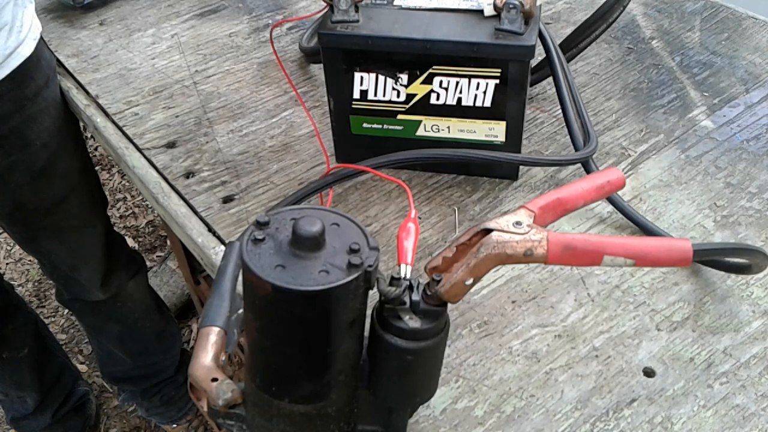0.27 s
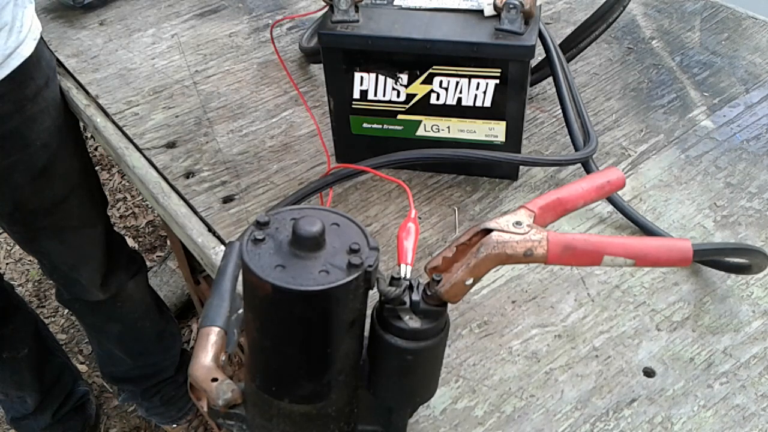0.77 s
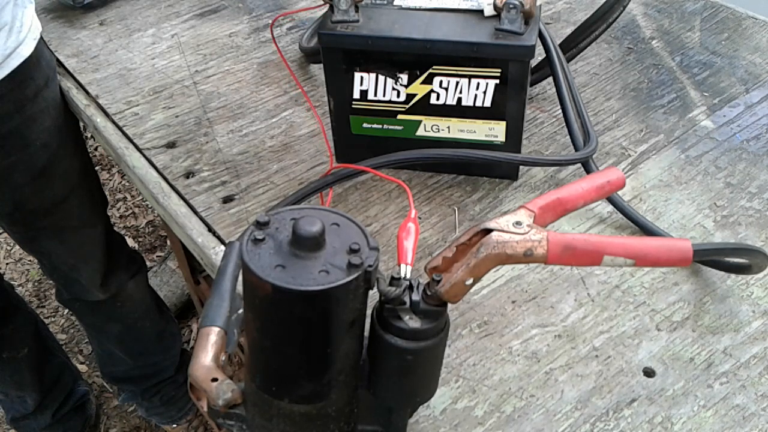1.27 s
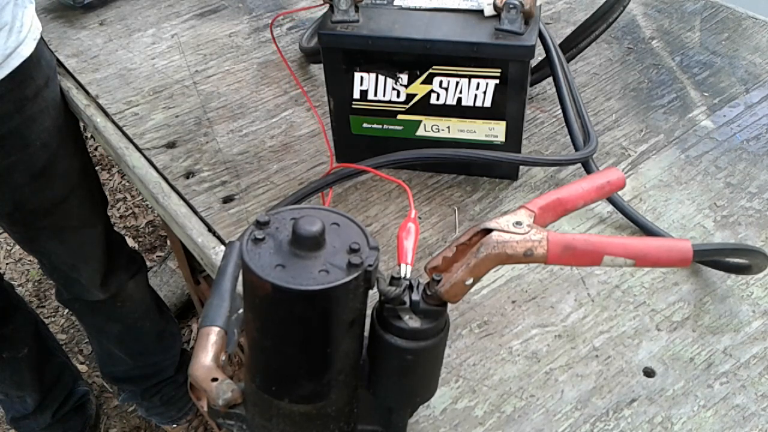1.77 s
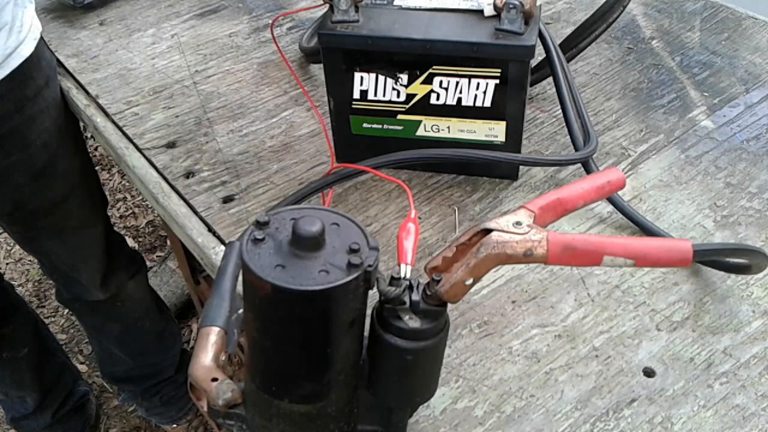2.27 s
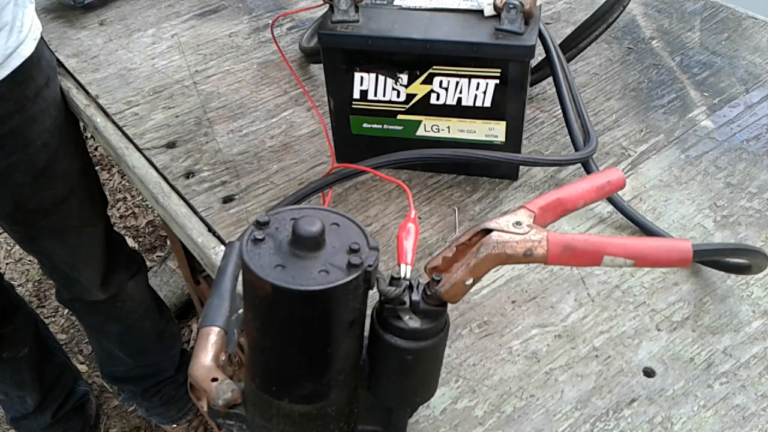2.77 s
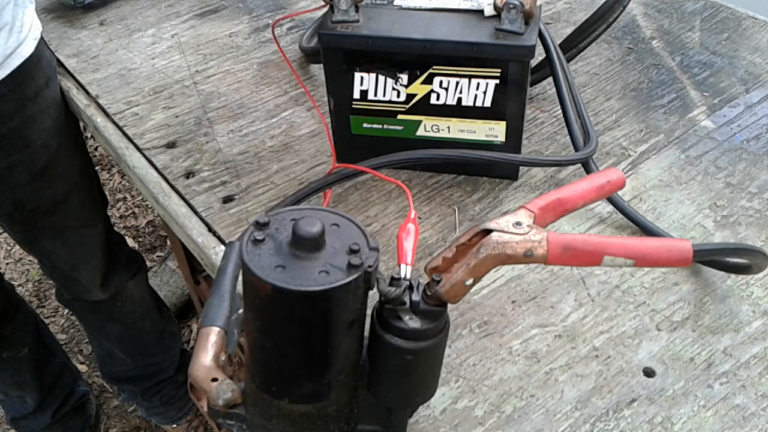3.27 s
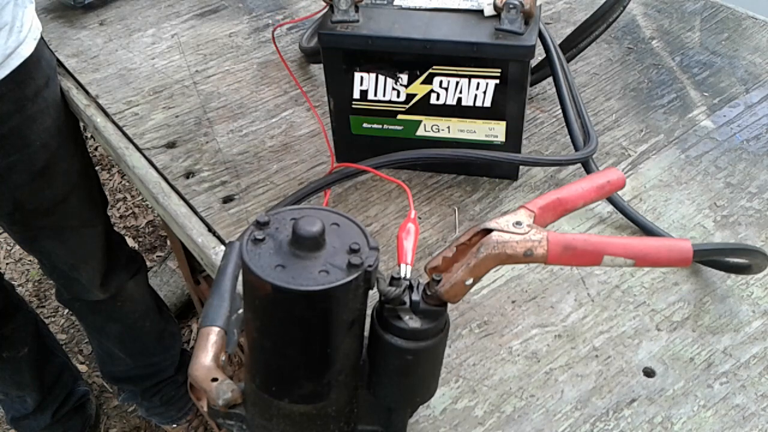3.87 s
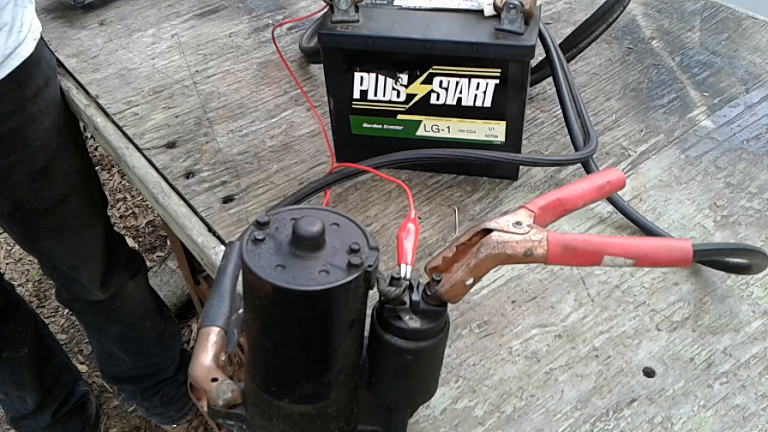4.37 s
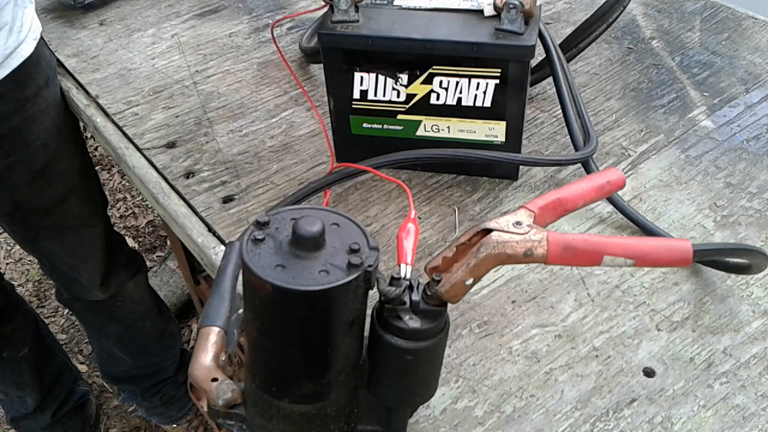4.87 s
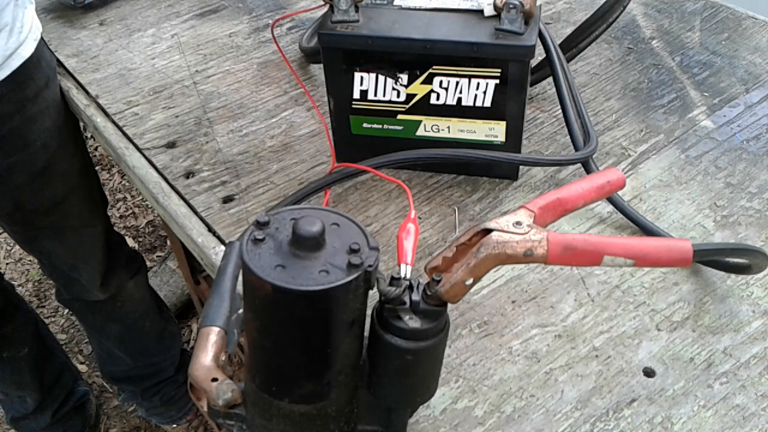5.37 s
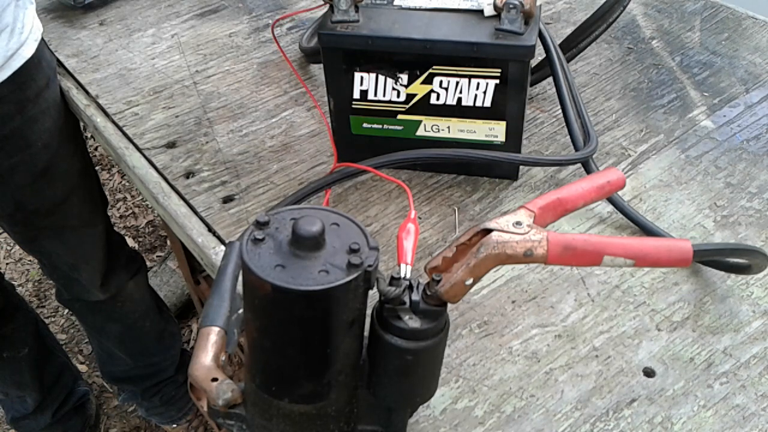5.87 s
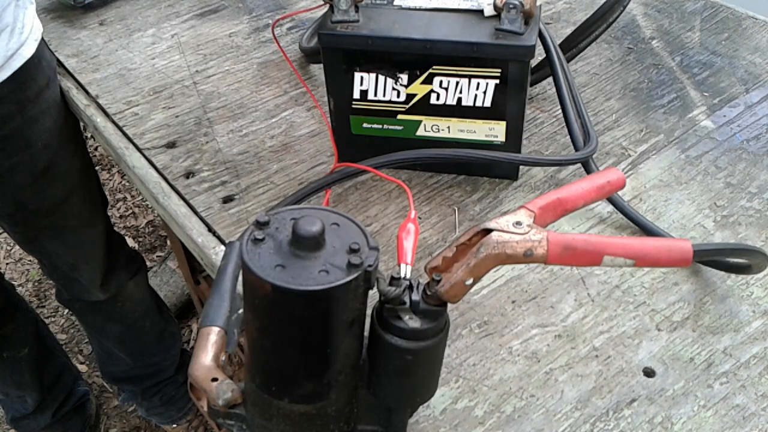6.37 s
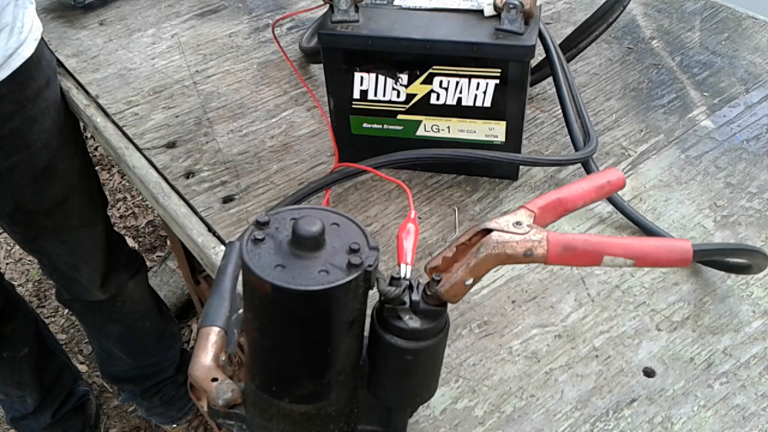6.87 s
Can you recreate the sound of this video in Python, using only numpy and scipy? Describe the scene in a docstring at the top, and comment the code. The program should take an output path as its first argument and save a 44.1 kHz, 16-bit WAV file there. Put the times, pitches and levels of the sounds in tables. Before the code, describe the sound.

A dry, scraping motor whir falls in pitch and stops. After a pause, steel slams on steel with a short woody thump, and the armature rushes up to a rough, hissing whine. Another cluster of hard clacks cuts power and it rattles down to stillness, with loose knocks near the end. Then the slam, spin and release happen again. Recorded very close, outdoors, with faint distant rumble.

```python
"""A starter motor is tested on a plywood bench outdoors, close to a two-port microphone.
It coasts to rest, then twice the solenoid slams in, the armature spins up and the solenoid drops out again.
Shaped noise makes the rattle and brush hiss, and sine tones the whine and hum; all follow the armature's speed.
Steel blows are short noise cracks, ringing sines and bright ticks; dying sines swing the bench at each throw.
Behind lie soft outdoor noise, faint far tones and one hoarse chirp."""
import sys
import numpy as np
from scipy import signal
from scipy.fft import rfft, irfft
from scipy.io import wavfile
from scipy.ndimage import uniform_filter1d

SR = 44100
rng = np.random.default_rng(int(sys.argv[2]) if len(sys.argv) > 2 else 0)


def master_out(mix):
    """Clip the mix to full scale and print it as 16-bit PCM to the path in sys.argv[1]."""
    frames = np.transpose(np.atleast_2d(mix))
    ceiling = np.clip(frames, -1, 1)
    pcm = np.round(ceiling * 32767).astype(np.int16)
    wavfile.write(sys.argv[1], SR, pcm)


N = 313531
TIME = np.arange(N) / SR  # s
HZ = np.fft.rfftfreq(N, 1 / SR)
BARS = 28  # commutator bars round the shaft

# each time the starter is energised:
# plunger slams home t/s, solenoid switched off t/s, free speed [turns/s], run-up time [s]
RUNS = [(1.6889, 3.2186, 242.3, 0.4094), (5.6819, 6.9432, 238.2, 0.3942)]
# the right port against the left: f/Hz, level/dB, lag [radians], likeness [0-1]
RIGHT_PORT = [(200, 2, -0.1, 0.99), (550, -1, -0.2, 0.95), (730, 3, -0.0, 0.65), (1000, -3, 0.7, 0.64),
              (1700, 3, 1.0, 0.75), (2350, 3, 1.6, 0.83), (2900, 0, 2.5, 0.75), (3400, -11, 2.6, 0.42),
              (3900, -19, 1.3, 0.45), (4500, -13, 1.9, 0.21), (5100, -6, 2.3, 0.61), (6100, -11, 3.1, 0.18),
              (7500, -6, 3.9, 0.24), (9000, -9, 3.9, 0.12), (10500, -2, 3.9, 0.35), (15000, -1, 1.5, 0.35)]


def amp(db):
    """Turns decibels into a gain."""
    return 10 ** (np.asarray(db) / 20)


def unit(x):
    """Scales a signal to rms 1."""
    return x / np.sqrt(np.mean(x ** 2) + 1e-20)


def read(table, hz):
    """Reads the columns of a table at any frequency, sliding smoothly between its rows."""
    f, *columns = np.transpose(table)
    return [np.interp(np.log(hz + 1), np.log(f + 1), c) for c in columns]


def colour(x, gain):
    """Filters a signal by a gain for each frequency."""
    return irfft(rfft(x) * gain, x.shape[-1])


def above(x, edge, order=4):
    """A smooth step from 0 to 1 as x rises past the edge; over frequency it acts as a high-pass."""
    return 1 - 1 / (1 + (x / edge) ** order)


def bell(x, centre, width):
    """A resonance curve of height 1."""
    return 1 / (1 + (2 * (x - centre) / width) ** 2)


def drift(rate_hz):
    """Slow random wandering of rms 1."""
    return unit(colour(rng.standard_normal(N), 1 / (1 + (HZ / rate_hz) ** 4)))


def add(mix, s, sound):
    """Mixes a sound in at time s."""
    part = mix[..., round(s * SR):][..., :sound.shape[-1]]
    part += sound[..., :part.shape[-1]]


def blend(a, b, same):
    """Mixes two spectra so that the result is alike to the first by the given share."""
    return same * a + np.sqrt(1 - same ** 2) * b


def ports(pair):
    """The left port hears the first signal; the right hears it shifted and recoloured, blended with the second."""
    db, lag, same = read(RIGHT_PORT, HZ)
    a, b = rfft(pair)
    right = amp(db) * np.exp(-1j * lag) * blend(a, b, np.clip(same, 0, 1))
    return irfft(np.array([a, right]), N)


def motor(split_hz=1900, fizz_hz=7200, fizz_db=4.5, coast_fizz_db=1, fizz_trim_db=1):
    """Rubbing rings the case: rattle below, brushes above, more fizz at high speed; whine and hum ride on top."""
    # what the motor case radiates: f/Hz, level/dB per Hz
    case = [(40.0, -26), (100.0, -3.5), (250.0, 1.5), (450.0, -0.5), (750.0, -1), (1500.0, -4.5),
            (3000.0, 0), (4500.0, -3), (6500.0, -15), (7500.0, -15.5), (10000.0, -22), (15500.0, -32)]
    # the resonances of the case: f/Hz, width [Hz], lift [dB]
    case_peaks = [(466, 160, 9.8), (578, 31, 10.5), (1069, 490, 9), (2110, 950, 3.2), (2387, 64, 5.1),
                  (2630, 115, 2.4), (3887, 340, 9.84), (4520, 73, 4.5), (6180, 820, 8), (9160, 210, 2.6)]
    speed, driven, current = armature()
    turns = np.cumsum(speed) / SR
    rattle_db, brush_db = friction_levels(speed, driven, current)
    case_db = read(case, HZ)[0]
    case_db = case_db + sum(db * bell(HZ, hz, width) for hz, width, db in case_peaks)

    source = rubbing(turns) + worn_track(turns, speed) + overtones(turns, speed)
    sound = ports(colour(source, amp(case_db) * above(HZ, 38)))
    brushes = colour(sound, above(HZ, split_hz, order=6))
    rattle = sound - brushes
    # the brush level is that of the top of the hiss
    hiss = colour(brushes.mean(0), above(HZ, 3978, order=30)).std()
    fizz = colour(brushes, above(HZ, fizz_hz, order=8))
    fizz_lift_db = fizz_trim_db + fizz_db * (speed / 190 - 1.5) + coast_fizz_db * (0.5 - driven)
    brushes = brushes + fizz * (amp(fizz_lift_db) - 1)

    out = amp(rattle_db) * rattle / rattle.mean(0).std() + amp(brush_db) * brushes / hiss
    out = out + whine(turns, speed, driven) + hum(turns, speed)
    return out * np.clip(speed / 6, 0, 1)  # fades out below 6 turns/s


def armature():
    """Speed [turns/s], drive (0 coasting, 1 driven) and current (0-1, used under drive), which falls as speed rises."""
    opening_speed = 96.54  # turns/s
    contact_s, break_s = 0.015, 0.0108  # main contacts close after the slam, open after the switch-off
    run_up_power = 0.774  # power of time: below 1 the run-up is steepest at first
    speed, driven, current = coast(opening_speed, TIME), np.zeros(N), np.zeros(N)
    for slam_s, cut_s, free_speed, run_up_s in RUNS:
        on = round((slam_s + contact_s) * SR)
        off = round((cut_s + break_s) * SR)
        current[on:] = np.exp(-(TIME[:N - on] / run_up_s) ** run_up_power)
        driven[on:off] = 1
        speed[on:off] = free_speed * (1 - current[on:off])
        speed[off:] = coast(speed[off - 1], TIME[:N - off])
    return speed, uniform_filter1d(driven, size=600), current


def coast(start_speed, elapsed_s):
    """Dry brush friction and air drag bring the armature to rest."""
    friction = 125.0  # turns/s lost each second
    windage_speed = 278.7  # turns/s at which air drag equals the friction
    angle = np.arctan(start_speed / windage_speed) - elapsed_s * friction / windage_speed
    return windage_speed * np.tan(np.maximum(angle, 0))


def friction_levels(speed, driven, current, loose_db=1.27, loose_hz=28, sputter_db=2.0, sputter_hz=110):
    """Rattle and brush hiss [dB] follow speed; driven brushes sputter and the motor shakes, coasting it flutters."""
    # speeds at which the driven motor shakes on the bench:
    # speed [turns/s], width [turns/s], rattle lift [dB], brush lift [dB]
    shakes = [(138, 35, 4, 3.5), (224.1, 30, 5.5, 7)]
    decades = np.log10((speed + 1) / 100)  # 0 near 100 turns/s, 1 at ten times that

    rattle = -38.5 - 1.5 * decades
    brush = -61 + 33 * decades
    brush = brush + 23.5 * current  # extra brush hiss at full current
    brush = brush + sputter_db * np.sqrt(current) * drift(sputter_hz)
    for centre, width, rattle_lift_db, brush_lift_db in shakes:
        shake = bell(speed, centre, width)
        rattle = rattle + rattle_lift_db * shake
        brush = brush + brush_lift_db * shake

    flutter = loose_db * drift(loose_hz) * np.clip(1.5 - speed / 150, 0, 1.5)
    chatter = 3 * above(speed, 180, order=16)  # the freed pinion chatters above 180 turns/s
    free_rattle = -40 + 18.5 * decades + flutter
    free_brush = -49.5 + 20 * decades + flutter / 2 + chatter
    coasting = 1 - driven
    return driven * rattle + coasting * free_rattle, driven * brush + coasting * free_brush


def rubbing(turns, flutter_db=1.08, wobble_db=1.1, slot_db=0.6, grain_db=1.5, grains_db=-6, slow_depth=0.31):
    """Friction noise and tiny knocks swell once a turn and at every fourth bar, more deeply at low speed."""
    sizes = amp(grain_db * np.minimum(rng.exponential(1, N), 3))
    happens = rng.random(N) < 1500 / SR  # about 1500 knocks a second
    knocks = rng.standard_normal((2, N)) * sizes * happens
    depth = 1 + slow_depth * np.clip(2 - np.gradient(turns) * SR / 55, 0, 1)
    angle = 2 * np.pi * turns
    turn_db = wobble_db * np.cos(angle) + slot_db * np.cos(angle * BARS / 4)
    swell_db = flutter_db * drift(52) + depth * turn_db
    noise = rng.standard_normal((2, N)) + amp(grains_db) * unit(knocks)
    return unit(noise * amp(swell_db) / np.sqrt(depth))


def worn_track(turns, speed, track_db=-3, size=4096, order=120):
    """The brushes ride over the same roughness every turn: a comb of high shaft multiples."""
    multiple = np.arange(order)
    height = rng.standard_normal((2, order)) + 1j * rng.standard_normal((2, order))
    track = unit(irfft(height * above(multiple, 52, order=8), size))
    ridden = np.array([np.interp(turns % 1, np.arange(size) / size, side) for side in track])
    return amp(track_db) * ridden * np.sqrt(order * speed / SR)


def overtones(turns, speed, slow_db=4, waver_db=0.5):
    """Slot and commutator overtones, clearest when coasting slowly; the case radiates them only in the treble."""
    # weaker tones locked to the shaft: multiple of the speed, level/dB before the lifts below
    orders = [(13, -19), (21, -26), (22, -22), (35, -21), (41, -22), (49, -26), (63, -26), (84, -24),
              (112, -24)]
    slow = np.clip(2 - speed / 100, 0, 1)
    gaining = uniform_filter1d(np.gradient(speed) * SR, size=2000)  # turns/s gained each second
    steady = 1 - np.clip(gaining / 500, 0, .8)  # weaker while speeding up
    angle = 2 * np.pi * turns + 0.004 * drift(60)
    tones = np.zeros((2, N))
    for multiple, db in orders:
        radiated = above(multiple * speed, 2350, order=12)
        start = rng.uniform(0, 2 * np.pi, (2, 1))
        tones += radiated * amp(db + waver_db * drift(22)) * np.cos(multiple * angle + start)
    return tones * steady * amp(slow_db * slow)


def whine(turns, speed, driven, coast_db=-2, octave_db=-7, driven_octave_db=-16):
    """Bars pass the brushes: a line and its octave flare on the case's resonances, patchy when coasting."""
    # how the case radiates the whine, before trims: f/Hz, driven level/dB, coasting level/dB
    case_whine = [(1750, -59, -61), (2270, -39, -40), (2450, -35, -45), (2740, -25.5, -35.5),
                  (3250, -35, -38), (3480, -46, -42), (3780, -28, -36), (4020, -33, -38), (4250, -45, -48),
                  (4550, -51, -43), (5000, -55, -43), (5750, -46, -44), (6200, -55, -53), (9000, -64, -58)]
    out = np.zeros((2, N))
    for multiple, driven_trim_db, coast_trim_db in [(BARS, 0, 0), (2 * BARS, driven_octave_db, octave_db)]:
        driven_db, free_db = read(case_whine, multiple * speed)
        patchy_db = 2.5 * drift(35)
        free_db = free_db + coast_db + coast_trim_db + patchy_db
        level_db = driven * (driven_db + driven_trim_db) + (1 - driven) * free_db
        out += shaft_tone(level_db, multiple * turns) * above(multiple * speed, 1400, order=8)
    return out * above(speed, 43, order=8)


def hum(turns, speed):
    """Unbalance hums at the shaft speed, loudest on the resonances of the mounting."""
    # resonances of the mounting: f/Hz, width [Hz], level/dB before the bell is squared and trimmed
    mount = [(137, 72, -44), (223, 25, -40.5)]
    felt = np.interp(TIME - 0.03, TIME, speed)  # the resonances take 0.03 s to build
    gain = sum(amp(db) * bell(felt, hz, width) ** 2 for hz, width, db in mount)
    return shaft_tone(20 * np.log10(gain), turns) * above(speed, 48)


def shaft_tone(db, turns):
    """One slightly unsteady sine line; the right port hears it with its own level and lag."""
    level_db = db + 2 * drift(25) - 1
    right_db, lag, _ = read(RIGHT_PORT, np.abs(np.gradient(turns)) * SR)
    angle = 2 * np.pi * turns
    pair = np.array([np.cos(angle), amp(right_db) * np.cos(angle - .75 * lag)])
    return np.sqrt(2) * amp(level_db) * pair


def strikes():
    """Every knock, clack and faint lead-in as (t/s, level/dB, treble/dB), in the same pattern for each run."""
    # the loose pinion knocks while coasting: t/s, level/dB
    knocks = [(.066, -23), (.258, -28), (.284, -36), (4.194, -22), (4.423, -32)]
    # the solenoid's pull-in blows: t/s from the slam, level/dB, treble/dB;
    # the first row is only a faint lead-in before the clacks
    pull_in = [(-0.015, -29, 3), (-0.0105, -16, 14), (-0.0088, -14, 0), (0, -2, 9.5), (0.005, -4.5, -2.5),
               (0.0125, -7.5, -4), (0.0215, -15.5, 14.5), (0.030, -13, -7)]
    # the blows as the spring throws the parts back: t/s after the switch-off, level/dB, treble/dB
    drop_out = [(0.0042, -10, 5.5), (0.0085, -8, 4.5), (0.017, -11.5, 1), (0.0297, -2, -2), (0.033, -23, 5),
                (0.0617, -8.5, -13)]
    # how hard the solenoid works in each run, added to the levels: pull-in [dB], drop-out [dB]
    force = [(0, 0.5), (0, -1)]
    blows = [(s, db, 4) for s, db in knocks]  # knocks have 4 dB of treble lift
    for (slam_s, cut_s, _, _), (pull_db, drop_db) in zip(RUNS, force):
        blows += [(slam_s + s, db + pull_db, treble_db) for s, db, treble_db in pull_in]
        blows += [(cut_s + s, db + drop_db, treble_db) for s, db, treble_db in drop_out]
    return blows


def solenoid(crack_t60=0.028, rattle_t60=0.16, rattle_db=-17, ring_db=5, treble_hz=4500, soft_s=0.00019):
    """Steel meets steel: a short crack, ringing modes, and a rattling tail from the bench."""
    # ringing modes of the steel: f/Hz, level/dB before the ring lift, time to fall 60 dB [s]
    steel = [(1020, -16.5, 0.11), (1706, -10.5, 0.058), (2027, 0.5, 0.016), (2500, -11, 0.075),
             (2964, -25.5, 0.058), (3776, -0.5, 0.017), (4220, -14, 0.051), (6060, -10, 0.011)]
    # the dense clatter between the modes: f/Hz, level/dB per Hz
    clatter_table = [(100, -24), (300, 17.5), (600, 11.5), (1300, 16.5), (2000, -14), (3000, 14.5),
                     (4000, -3), (5200, 2.5), (6200, 1.5), (8000, -12.5), (11000, -19), (16000, -31)]
    t = np.maximum(np.arange(8192) - 512, 0) / SR  # a still lead of 512 samples leaves room for the filters
    lead_s = np.argmax(t > 0) / SR
    hz = np.fft.rfftfreq(len(t), 1 / SR)
    fade = amp(-60 * t / crack_t60) + amp(rattle_db - 60 * t / rattle_t60)
    clatter = unit(amp(read(clatter_table, hz)[0]) * above(hz, 110))
    out = np.zeros((2, N))
    for s, db, treble_db in strikes():
        rise = 1 - np.exp(-t / (soft_s * min(amp(-37.0 - db), 1)))  # hard blows start more abruptly
        crack = colour(rng.choice([-1, 1], (2, len(t))) * fade * rise, clatter)
        ring = 0
        for f, level, t60 in steel:
            detuned = f * rng.normal(1, 0.0395, (2, 1))  # each time and side rings a little off
            ring = ring + amp(level - 60 * t / t60) * np.sin(2 * np.pi * (detuned * t + rng.random()))
        blow = colour(crack + amp(ring_db) * ring * rise, amp(treble_db * above(hz, treble_hz)))
        add(out, s - lead_s, amp(db) * blow / 4)
    return ports(out)


def ticks(tick_t60=0.0082, tick_db=-20, tick_hz=6500, hardness=1.1):
    """The first instant of each hard blow is a bright tick; soft blows have hardly any."""
    out = np.zeros((2, N))
    fade = amp(-60 * np.arange(1024) / SR / tick_t60)
    for s, db, treble_db in strikes():
        level_db = tick_db + hardness * (db + treble_db / 2)
        add(out, s, amp(level_db) * fade * rng.choice([-1, 1], (2, len(fade))))
    return ports(colour(out, above(HZ, tick_hz) * (1 - above(HZ, 12500, order=8))))


def bench(rise_s=0.0068, low_hz=65):
    """The plunger's recoil sets the plywood swinging for a few cycles; the open board radiates no deep bass."""
    # the plywood's modes: f/Hz, level/dB against each other, time to fall 60 dB [s]
    board = [(98.5, -8, 0.2), (128.3, 6.5, 0.1), (147, 2.5, 0.066), (248, 1.5, 0.1), (400, -15, 0.51)]
    slam_delay_s, cut_delay_s = 0.00667, 0.00727  # recoil after the slam and after the switch-off
    recoil = amp(-13.5)  # peak, before the two ports part
    t = np.arange(SR // 3) / SR
    swing = sum(amp(db - 60 * t / t60) * np.sin(2 * np.pi * hz * t) for hz, db, t60 in board)
    swing = swing * (1 - np.exp(-t / rise_s))
    swing = signal.sosfilt(signal.butter(2, low_hz, "high", fs=SR, output="sos"), swing)
    swing = swing / abs(swing).max()
    out = np.zeros(N)
    for slam_s, cut_s, _, _ in RUNS:
        add(out, slam_s + slam_delay_s, recoil * swing)
        add(out, cut_s + cut_delay_s, recoil * swing)
    return out * amp([[-1], [1]])  # 1 dB down on the left, 1 dB up on the right


def yard():
    """Distant outdoor rumble swells gently under a steady hiss, with a few faint, wavering tones."""
    # colour of the outdoor air: f/Hz, left level/dB per Hz, right level/dB per Hz, likeness [-1 to 1]
    air_table = [(20, -21, -72, 0.8), (51.4, -19, -9, 0.85), (80, -10, -11, 1.0), (129, -1.5, 0.5, 0.94),
                 (173, -10, -9, 0.84), (400, -15, -12.5, 0.79), (830, -17.5, -15.5, -0.13),
                 (1500, -20, -18, -0.24), (2470, -25, -23.5, -0.055), (3280, -26.5, -30.5, 0.13),
                 (3860, -27.5, -37, -0.49), (5070, -39.5, -39.5, 0.17), (8000, -44.5, -43.5, -0.0037),
                 (15500, -44.5, -44, 0.0)]
    # faint tones from far away: f/Hz, level/dB before the lifts below
    far_tones = [(764.4, -70), (882.9, -72), (1179, -75), (4129, -84.5)]
    left_db, right_db, same = read(air_table, HZ)
    a, b = rfft(rng.standard_normal((2, N)))
    right = amp(right_db) * blend(a, b, np.clip(same, -1, 1))
    air = irfft(np.array([amp(left_db) * a, right]), N)
    hiss = colour(air, above(HZ, 400))
    rumble = (air - hiss) * amp(drift(6))
    air = hiss + rumble
    air = amp(-51) * air / air.mean(0).std()
    for hz, db in far_tones:
        angle = 2 * np.pi * np.cumsum(hz + 2 * drift(25)) / SR  # the pitch wavers by about 2 Hz
        sides = np.array([[1], [amp(read(RIGHT_PORT, hz)[0])]])
        level_db = db + 1.5 + 2 * above(hz, 3000) + 2 * drift(4)
        air = air + amp(level_db) * np.sqrt(2) * np.sin(angle) * sides / sides.mean()
    return air


def chirp(s=5.1, length_s=0.027, hz=3330, width_hz=100, db=-60):
    """One faint, hoarse chirp far away: a narrow band of noise that swells and fades."""
    band = unit(colour(rng.standard_normal((2, N)), np.exp(-((HZ - hz) / width_hz) ** 2)))
    return ports(amp(db) * band * np.exp(-((TIME - s) / length_s) ** 2))


def scene():
    """Motor, solenoid and bench in the open air."""
    return motor() + solenoid() + ticks() + bench() + yard() + chirp()


def record(dry):
    """The microphone rounds off the hardest peaks; then the recorder cuts the top of the treble."""
    rounded = dry / (1 + (dry / 0.8) ** 4) ** 0.25
    low_pass = signal.firwin(511, 15850, window=("kaiser", 9), fs=SR)  # edge at 15850 Hz
    return signal.oaconvolve(rounded, low_pass[None], "same")


dry = scene()
out = record(dry)
master_out(out)
```